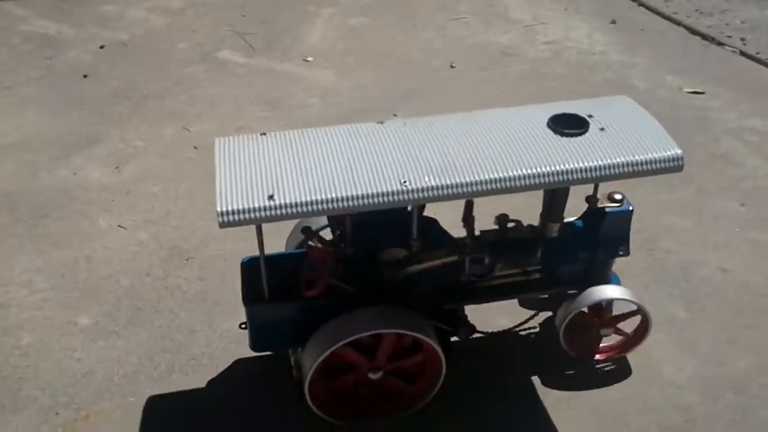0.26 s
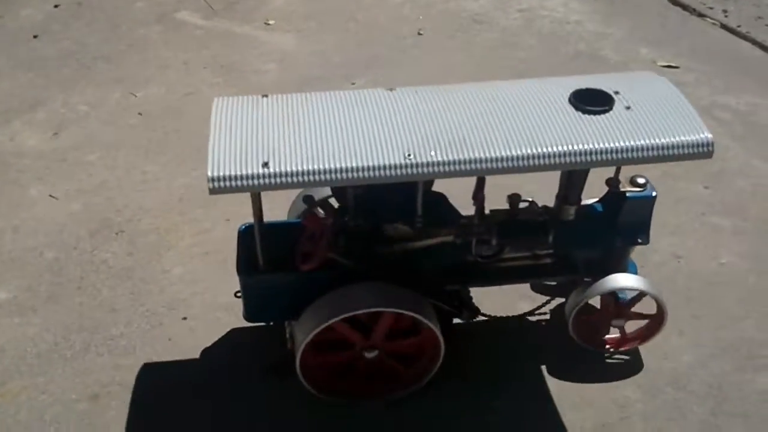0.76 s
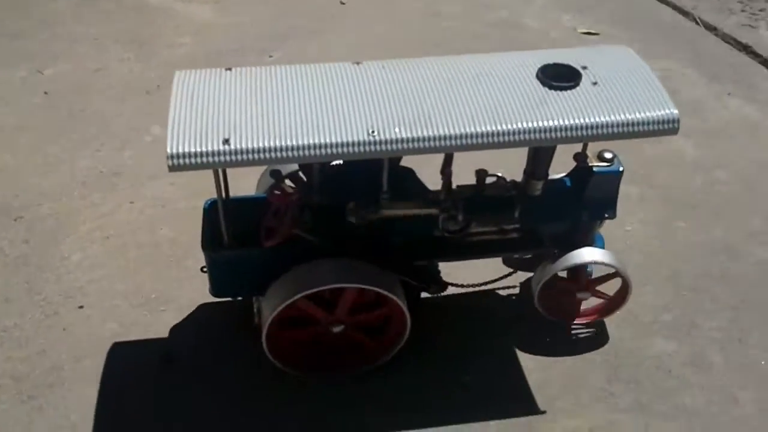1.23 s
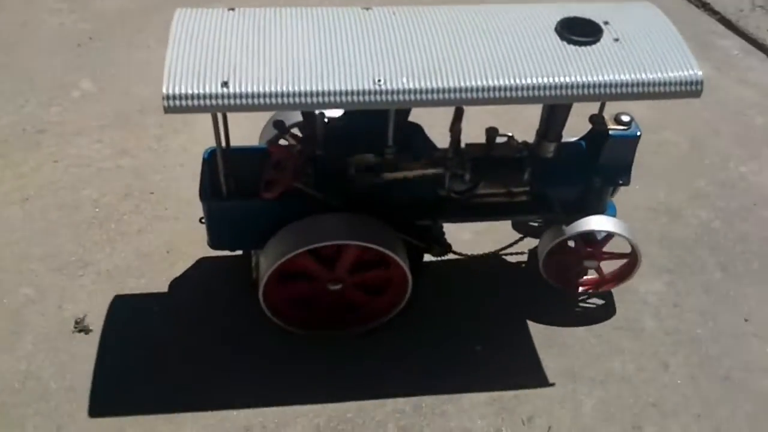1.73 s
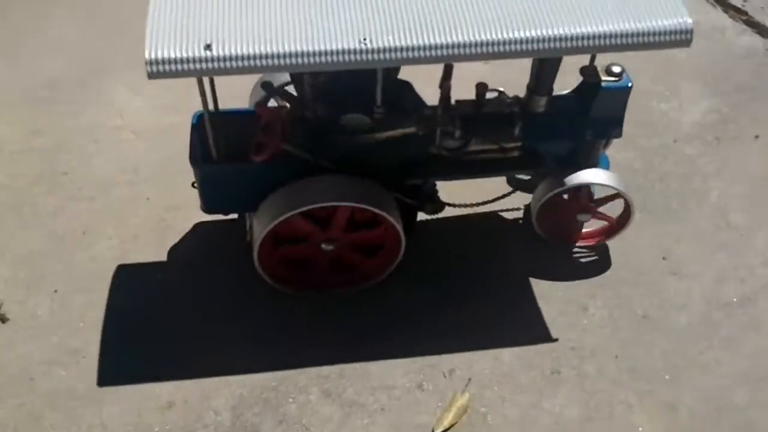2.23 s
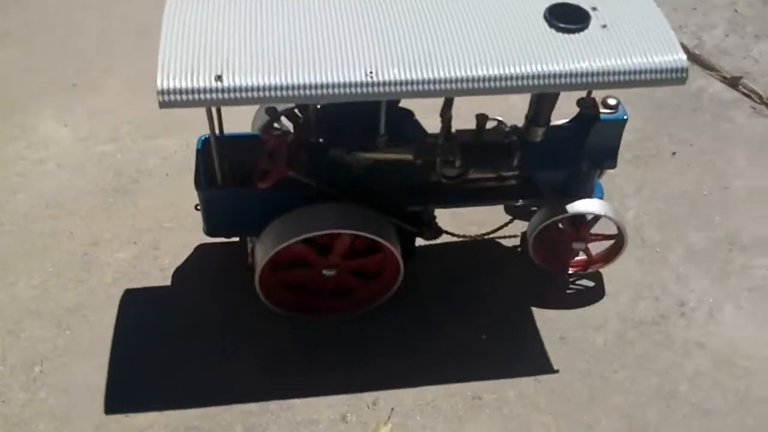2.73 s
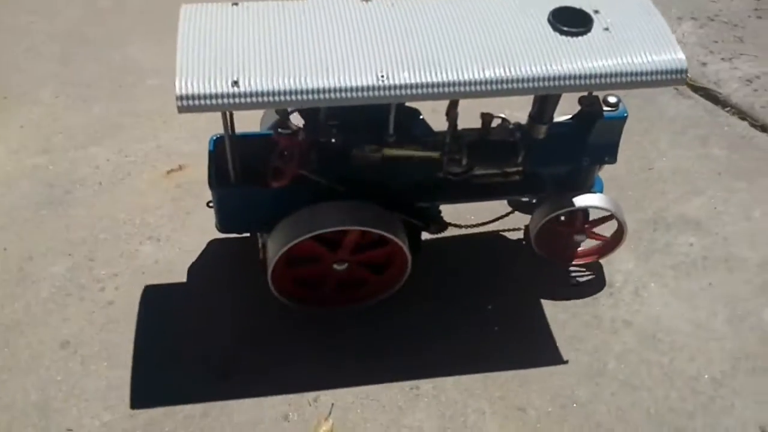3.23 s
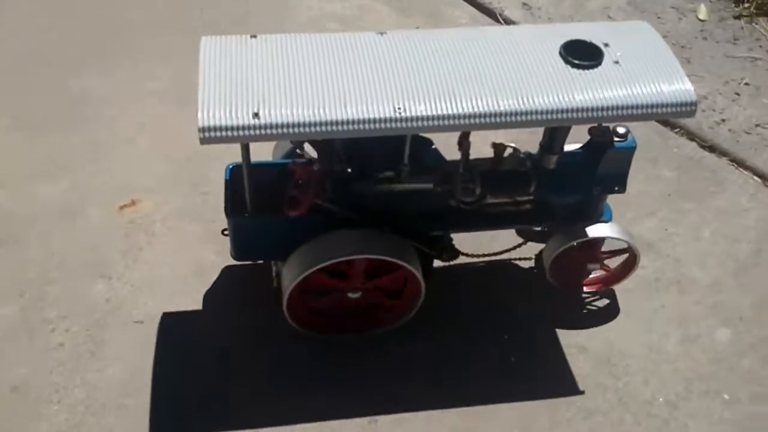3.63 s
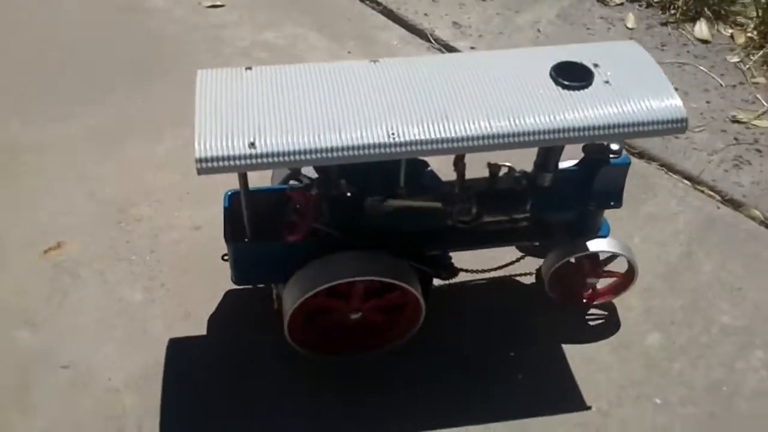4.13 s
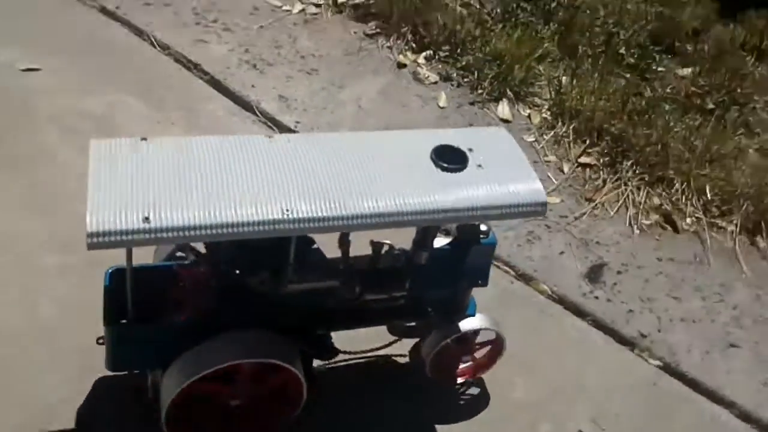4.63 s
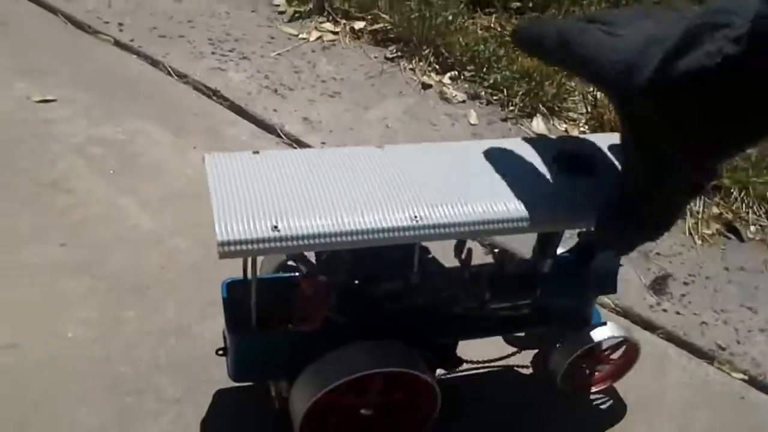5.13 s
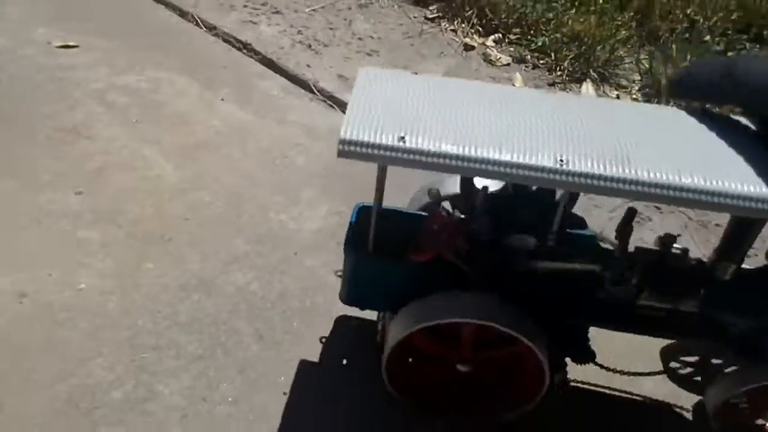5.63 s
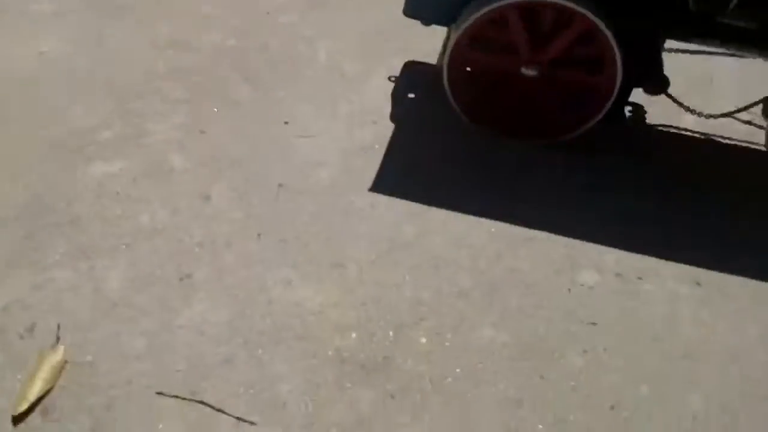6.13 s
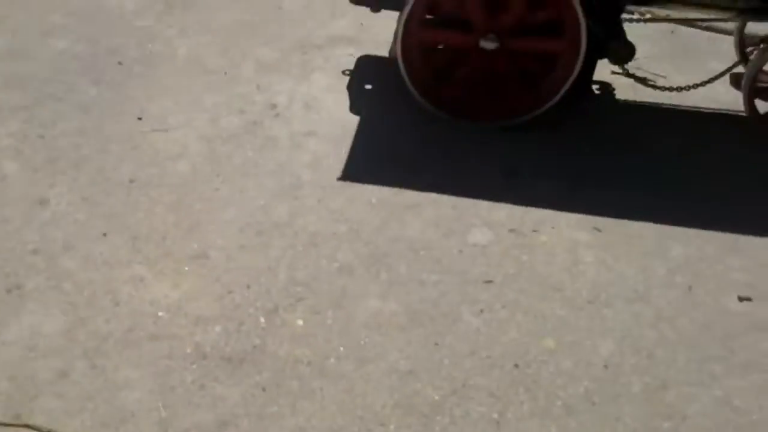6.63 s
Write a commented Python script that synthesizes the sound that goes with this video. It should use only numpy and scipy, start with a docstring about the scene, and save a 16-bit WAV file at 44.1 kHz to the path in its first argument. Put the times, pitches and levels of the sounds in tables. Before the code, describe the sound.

From 0 seconds a small metal engine is already running close by on outdoor concrete. Around sixteen or seventeen quick strokes a second load a tin gear train, giving a fast, slightly irregular brrr of bright chatter, ringing mostly around 4 kHz, with hollow roof and boiler rattle below and fine, hissy steel fizz above. Hard dry ticks and knocks stand out, stronger from about 1.7 seconds, with especially sharp ones near 4.2 and 4.7. Loose links tink briefly throughout. Between 5 and 5.8 seconds knocks crowd together. At about 5.85 the wheels scrape harshly, ease briefly around 6.0 as a bright clink sounds, then drag in gritty bursts, strongest near 6.35, with looser, uneven strokes and more clinks to the cut at about 6.9. Faint steady traffic rumbles far underneath. The sound is dry, centred and identical in both channels.

```python
"""Fast tinny chatter with bright knocks: a toy steam tractor rolls over concrete close by.
Piston strokes load a tin gear train, whose teeth ring the body by touches and short tone bursts.
Loose steel links tink as decaying sines; wheels grind on grit as noise touches; far traffic rumbles.
Wheel scrape runs throughout and peaks near the end, as a hand grips the roof and drags the wheels round.
One microphone feeds both channels."""
import sys
import numpy as np
from scipy import signal
from scipy.fft import rfft, irfft, next_fast_len
from scipy.io import wavfile
from scipy.ndimage import uniform_filter1d, map_coordinates

SR = 44100
rng = np.random.default_rng(int(sys.argv[2]) if len(sys.argv) > 2 else 0)


def transcribe(signal):
    """Save signal, clipped to [-1, 1], as a 16-bit WAV file at the path in sys.argv[1]."""
    frames = np.atleast_2d(signal).T
    limited = np.clip(frames, -1, 1)
    pcm = np.round(limited * 32767).astype(np.int16)
    wavfile.write(sys.argv[1], SR, pcm)


N = 302526

# Engine drive, interpolated: time_s, grind_db, boiler_db, roof_db, small_parts_db
RUNNING_LEVELS = [(0, -34, -16.5, -13, -17), (1.2, -33, -17, -10.5, -23.5), (2, -35, -13.5, -13, -19.5),
                  (2.7, -33.5, -17, -12.5, -23), (3.2, -35, -15.5, -12, -19.5),
                  (3.8, -33.5, -16.5, -11, -24), (4.7, -34.5, -15, -12.5, -18),
                  (5.4, -35, -13.5, -11.5, -24), (5.75, -38.5, -10.5, -9.5, -17.5),
                  (6.051, -40, -16, -15, -21.5), (6.5, -37, -16, -12, -18.5),
                  (6.86, -33.5, -18.5, -10.5, -16.5)]
# Piston strokes and drags: start_s, load_db, hold_s
PISTON_STROKES = [(0.0, -22.5, 0.011), (0.061, -25.0, 0.018), (0.134, -26.5, 0.048), (0.188, -23, 0.019),
                  (0.244, -24.5, 0.022), (0.319, -24, 0.029), (0.368, -23, 0.021), (0.418, -41, 0.033),
                  (0.507, -23.5, 0.056), (0.573, -20.0, 0.019), (0.612, -32.5, 0.043), (0.682, -31, 0.038),
                  (0.741, -23, 0.044), (0.832, -35, 0.0), (0.87, -37, 0.068), (0.948, -22.5, 0.0094),
                  (0.979, -21.5, 0.03), (1.046, -33, 0.06), (1.126, -21.5, 0.057), (1.237, -20, 0.00079),
                  (1.291, -22, 0.021), (1.352, -21.5, 0.025), (1.414, -20.5, 0.015), (1.479, -21, 0.013),
                  (1.54, -20, 0.01), (1.6, -23.0, 0.012), (1.662, -24.5, 0.056), (1.735, -24.5, 0.0),
                  (1.786, -20.5, 0.014), (1.847, -26, 0.033), (1.897, -22, 0.019), (1.969, -24, 0.0052),
                  (2.023, -23.0, 0.018), (2.085, -24.0, 0.017), (2.145, -22.5, 0.044), (2.211, -21, 0.0098),
                  (2.266, -22.5, 0.019), (2.325, -21, 0.017), (2.387, -21, 0.018), (2.439, -26.5, 0.014),
                  (2.481, -38, 0.0), (2.499, -19.5, 0.023), (2.567, -28, 0.025), (2.62, -19.5, 0.024),
                  (2.689, -18, 0.019), (2.749, -31, 0), (2.809, -39, 0.0074), (2.866, -20.0, 0.027),
                  (2.927, -21.5, 0.017), (2.981, -22.5, 0.016), (3.019, -21.5, 0.042),
                  (3.104, -30.0, 0.057), (3.179, -22, 0.014), (3.225, -20, 0.015), (3.297, -28, 0.0),
                  (3.358, -17.5, 0.015), (3.41, -25.5, 0.014), (3.466, -27, 0.047), (3.535, -27.5, 0.026),
                  (3.593, -24, 0.025), (3.659, -27.5, 0.017), (3.714, -20, 0.016), (3.772, -22.0, 0.028),
                  (3.833, -23.0, 0.034), (3.891, -28.5, 0.055), (3.963, -20.5, 0.017), (4.021, -22, 0.017),
                  (4.08, -24, 0.032), (4.146, -21, 0.02), (4.206, -27, 0.0056), (4.262, -21.5, 0.022),
                  (4.324, -24, 0.039), (4.392, -22.5, 0.014), (4.436, -36, 0.024), (4.508, -21, 0.026),
                  (4.57, -18.5, 0.018), (4.633, -30.5, 0.0073), (4.658, -34, 0.0), (4.693, -24.5, 0.044),
                  (4.753, -23.5, 0.0035), (4.819, -25.5, 0.0091), (4.864, -31.5, 0.0), (4.881, -23, 0.02),
                  (4.939, -24, 0.024), (4.995, -19.5, 0.016), (5.064, -22.5, 0.01), (5.128, -17.5, 0.0059),
                  (5.175, -22.5, 0.034), (5.243, -25, 0.059), (5.307, -24, 0.045), (5.378, -20, 0.012),
                  (5.43, -27, 0.05), (5.487, -25, 0.022), (5.572, -22.0, 0.024), (5.626, -22.5, 0.016),
                  (5.663, -23.5, 0.0072), (5.689, -23.5, 0.02), (5.738, -19, 0.02), (5.785, -22, 0),
                  (5.818, -25.0, 0.0075), (5.845, -31.5, 0.0082), (5.875, -19.5, 0), (5.913, -21.5, 0.016),
                  (5.952, -26, 0.04), (6.04, -19.0, 0.0), (6.097, -25, 0.0), (6.131, -20, 0.087),
                  (6.276, -34.5, 0.0099), (6.295, -37.5, 0.024), (6.337, -19.5, 0.0049),
                  (6.395, -29.5, 0.07), (6.474, -25.5, 0.055), (6.561, -25.0, 0.019), (6.678, -28, 0.04),
                  (6.735, -21.5, 0.037), (6.808, -32.5, 0.02)]
# Hardest tooth knocks: centre_s, level_db, length_ms
TOOTH_KNOCKS = [(0.1458, -12.5, 2.2), (0.1759, -16, 1.3), (0.248, -14, 1.4), (0.2641, -13, 1.5),
                (0.3312, -13.5, 1.6), (0.3948, -12, 1.5), (0.484, -15, 0.6), (0.654, -17, 1.8),
                (0.8953, -9.5, 0.55), (0.9544, -12, 1.6), (1.057, -13.5, 3), (1.204, -15, 0.6),
                (1.2408, -12.5, 0.6), (1.396, -13, 0.6), (1.4479, -17, 0.54), (1.68, -9.5, 1.8),
                (1.7381, -10, 1.65), (1.7473, -6, 1), (1.7987, -7, 2), (2.153, -7.5, 0.7), (2.167, -5, 1.1),
                (2.2278, -6, 2), (2.288, -12.5, 1.5), (2.34, -17, 1), (2.445, -13.5, 1.6),
                (2.4845, -12, 1.14), (2.5656, -9, 1.4), (2.587, -9, 0.84), (2.6462, -8, 2.2),
                (2.703, -9, 1.03), (2.707, -8, 0.7), (2.82, -14, 1.2), (2.868, -10, 0.79), (2.894, -7, 1.6),
                (2.9336, -8, 0.55), (2.9495, -20, 1.36), (2.964, -12, 0.47), (3.127, -9, 1.0),
                (3.2015, -11.5, 1.5), (3.252, -9, 1.7), (3.3038, -16, 1.6), (3.3314, -18, 0.4),
                (3.3596, -13, 1.1), (3.3771, -5, 1.2), (3.3825, -12, 0.54), (3.4428, -8.5, 0.9),
                (3.4842, -11, 1.0), (3.6388, -15, 0.9), (3.739, -8.5, 1.3), (3.7897, -8, 0.94),
                (3.8604, -11, 1.5), (3.972, -10, 0.54), (4.0627, -18, 1.1), (4.1584, -13, 1.3),
                (4.1783, -2, 0.43), (4.23, -11, 0.87), (4.2821, -11, 0.9), (4.2918, -11, 0.71),
                (4.3024, -16, 1.0), (4.333, -13, 0.66), (4.395, -4.5, 0.29), (4.5099, -20, 1.1),
                (4.5297, -8, 1.5), (4.6646, -12, 0.46), (4.7005, 0, 0.35), (4.7084, -11, 1.0),
                (4.7305, -12, 0.57), (4.823, -13.5, 1.8), (4.964, -11, 1.3), (5.0106, -11, 1.8),
                (5.0153, -5, 1.24), (5.0688, -19, 1.0), (5.1297, -9, 1.4), (5.1395, -13, 1.1),
                (5.2015, -12.5, 1.64), (5.2074, -10, 1.13), (5.2467, -11.5, 1.0), (5.325, -9, 1.44),
                (5.3768, -8, 0.97), (5.3815, -9, 1.3), (5.3871, -8, 1.5), (5.393, -9, 1.3),
                (5.4548, -6.5, 1.6), (5.496, -8, 1.1), (5.508, -6, 1.5), (5.5135, -10, 1.7),
                (5.5778, -12, 1.1), (5.5855, -10, 1.6), (5.6078, -7.5, 1.1), (5.64, -9, 1.1),
                (5.6443, -7, 0.95), (5.6495, -5, 0.7), (5.6693, -9, 1.5), (5.6742, -5, 1.1), (5.7, -4, 0.8),
                (5.7205, -8, 0.62), (5.751, -8, 0.6), (5.8552, -14, 0.75), (5.8926, -13, 0.91),
                (5.9151, -14, 0.53), (5.9264, -5, 0.76), (5.9651, -12, 0.66), (5.9807, -8, 0.42),
                (6.0471, -5, 1.3), (6.0536, -16, 0.93), (6.0712, -15, 0.6), (6.137, -15, 0.71),
                (6.2985, -14, 0.64), (6.3432, -12, 0.9), (6.6103, -16, 0.9)]
# Main shell note as it turns past the microphone: time_s, pitch_hz
SHELL_PITCH = [(0, 4080), (1.2, 4180), (2.3, 4200), (3.3, 4160), (4.2, 4080), (5.3, 4060), (5.9, 4104),
               (6.86, 4320)]
# Hand damps the tin, wheels scrape: time_s, scrape_share (0-1)
HAND_GRIP = [(0, 0.18), (5.4, 0.13), (5.56, 0.45), (5.72, 0.24), (5.849, 1), (6, 0.05), (6.13, 0.64),
             (6.25, 0.3), (6.35, 1), (6.451, 0.42), (6.6, 0.47), (6.72, 0.5), (6.86, .7)]
# Bright tin modes: centre_hz, width_hz, relative_level_db
SHELL_MODES = [(2150, 120, -38), (2630, 140, -15), (2930, 260, -10.5), (3370, 120, -2.5), (3722, 118, 2.5),
               (3903, 233, 3.5), (4143, 164, 4.5), (4980, 69, -17), (4700, 380, -28), (5280, 290, -11.5),
               (5850, 50, -14), (6190, 270, -28.5)]
# Roof modes: centre_hz, width_hz, relative_level_db
ROOF_MODES = [(961, 35, -3.5), (1224, 210, -5), (1453, 370, -7.5), (1740, 147, 1)]
# Boiler modes: centre_hz, width_hz, relative_level_db
BOILER_MODES = [(514, 84, -2), (658, 91, 0)]
# Frame modes: centre_hz, width_hz, relative_level_db
FRAME_MODES = [(366, 31, -2), (455, 75, -1.5)]
# Small steel parts: centre_hz, width_hz, relative_level_db
SMALL_PART_MODES = [(7090, 84, 6), (7360, 310, -0.5), (8455, 230, 7), (9200, 330, 2), (9700, 410, -3.5),
                    (11100, 140, -4.5), (11770, 160, -4), (12620, 68, 9), (13000, 210, -21),
                    (13900, 690, -10.5)]
# Wheels on concrete, spectrum: frequency_hz, relative_density_db
SCRAPE_SPECTRUM = [(700, -29.5), (950, -9), (1150, 0), (1400, -14.5), (1580, -1.5), (1900, -9),
                   (2200, -7.5), (2450, -1.5), (2900, -3.5), (3900, 1), (4800, -1), (6000, -9), (8000, -29),
                   (12000, -34.5)]
# Loose link tinks: start_s, relative_level_db, strongest_pitch_hz
LINK_TINKS = [(0.189, -22.5, 8500), (0.3264, -22, 5760), (0.667, -19, 5930), (0.71, -18.5, 7240),
              (.7427, -27, 6000), (.9537, -23.5, 5790), (1.046, -20, 5760), (1.0735, -17.5, 5720),
              (1.1149, -27, 5910), (1.2212, -24, 5950), (1.478, -22, 5730), (1.6945, -26, 6000),
              (2.0213, -30, 8640), (2.0338, -22, 5770), (2.1014, -22, 5700), (2.3365, -21.5, 5860),
              (2.6843, -20.5, 5950), (2.8673, -37, 5640), (3.2029, -17, 6060), (3.2954, -26.5, 9240),
              (3.309, -20, 13360), (3.3647, -33, 5900), (3.6636, -28, 5950), (3.7763, -29, 6190),
              (3.808, -16.5, 5620), (3.9439, -20.5, 5930), (4.0073, -24, 5730), (4.137, -25, 8150),
              (4.416, -24, 12500), (4.593, -23, 12500), (4.6524, -21.5, 6040), (4.6999, -21, 5700),
              (4.817, -25.5, 8420), (4.996, -19.5, 5860), (5.1337, -34, 5840), (5.4335, -25, 5840),
              (5.5797, -18.5, 6200), (5.7004, -24, 5850), (5.8378, -34, 5820), (6.0428, -11, 6620),
              (6.254, -17, 6000), (6.509, -14, 7180), (6.6813, -26, 5910), (6.7863, -14.5, 5980),
              (6.817, -21, 12500)]
# Steel link ringing: pitch_hz, relative_level_db, t60_s
LINK_RINGS = [(5950, 0, 0.12), (6800, -8, 0.04), (7100, -9.5, 0.19), (7830, 1, 0.028), (8450, -2.5, 0.07),
              (9260, -1, 0.06), (11150, -7, 0.091), (12500, -5, 0.052), (14200, -3, 0.022)]
# Far traffic spectrum: frequency_hz, relative_density_db
TRAFFIC_SPECTRUM = [(15, -45), (25, -10), (38, -20.5), (75, -0.5), (102, 1), (260, -5), (290, -8),
                    (330, -11.5), (430, -46), (730, -120)]

TEETH_PER_S = 197
BITE_S, BITE_SHARE, RISE_S, FALL_T60_S = 0.0033, 0.89, 0.012, 0.088  # stroke envelope
SLACK_S, FIRM_GAP_S = 0.003, 0.0102  # slack before the first firm tooth; gap between firm teeth
KNOCK_SPREAD = 0.037  # log-pitch scatter
OTHER_NOTES_DB = -7.5  # other link notes and crack, before their own gains
TRAFFIC_DB = -48.5
ROLL_HZ, TOP_HZ = 14100, 15100


def engine():
    """Tooth chatter, wheel grind and knocks excite the resonances of one tin body."""
    time_s = np.arange(N) / SR
    running_s, *columns = np.transpose(RUNNING_LEVELS)
    grind_db, boiler_db, roof_db, small_parts_db = [np.interp(time_s, running_s, c) for c in columns]
    grip = np.clip(np.interp(time_s, *np.transpose(HAND_GRIP)), 0, 1)
    free, dragged = np.sqrt(1 - grip), np.sqrt(grip)
    force = stroke_load()
    chatter = gear_chatter(force)
    grind = wheel_grind(grind_db)
    heave = uniform_filter1d(force, SR // 70) * rng.standard_normal(N)  # heavy boiler follows load slowly
    simmer = amp(-34) * rng.standard_normal(N)  # boiler hums on between strokes
    hiss = amp(-29.5 + 4.9 * wobble(25)) * rng.standard_normal(N)

    light_teeth = 0.34 * force * teeth(TEETH_PER_S, spread=0.1, scatter_db=2, ms=1.14)
    rings = free * (light_teeth + firm_teeth(force)) + knocks()
    shell = 0.82 * shifting(SHELL_MODES, free * (chatter + grind), vary_db=2.5)
    scrape = wheel_scrape(force, chatter, grind, dragged)
    boiler_force = amp(boiler_db) * (0.24 * chatter + 0.75 * heave + 2 * grind + simmer)
    boiler = through(modes(BOILER_MODES), boiler_force)
    frame_force = amp(-21.5) * (0.5 * chatter + 0.62 * heave + 2.4 * grind)
    frame = through(modes(FRAME_MODES), frame_force)
    roof = shifting(ROOF_MODES, amp(roof_db) * (1.26 * chatter + 1.8 * grind), vary_db=0.95)
    small_parts = through(small_part_response, amp(small_parts_db) * (0.83 * chatter + hiss))
    return rings + shell + scrape + boiler + frame + roof + small_parts


def stroke_load():
    """Gear force: bites at each stroke, swells, holds and dies away."""
    force, t = np.zeros(N + SR), np.arange(SR // 3) / SR
    bite = np.minimum(t / BITE_S, 1)
    swell = BITE_SHARE + (1 - BITE_SHARE) * np.minimum(t / RISE_S, 1)
    for start_s, load_db, hold_s in PISTON_STROKES:
        fall_db = -60 * np.maximum(t - RISE_S - hold_s, 0) / FALL_T60_S
        force[round(start_s * SR):][:len(t)] += bite * swell * amp(load_db + fall_db)
    return force[:N]


def gear_chatter(force):
    """Loaded teeth rattle as they land amid gritty touches; hard knocks add jolts."""
    rebounds = contacts(TEETH_PER_S, jitter=0.24, scatter_db=3.5, touch_s=0.00074)
    grit = contacts(600, jitter=0.924, scatter_db=0.5, touch_s=0.00029)
    return force * (0.45 * rebounds + 0.5 * grit) + jolts()


def jolts():
    """Hard knocks jolt the whole body with short noise bursts."""
    centre_s, level_db = np.transpose(TOOTH_KNOCKS)[:2]
    at = np.round((centre_s - 0.001) * SR).astype(int)
    gate = signal.fftconvolve(np.bincount(at, amp(level_db - 18), N), bump(0.0006))[:N]
    return gate * rng.standard_normal(N)


def knocks():
    """The hardest teeth ring the shell near its main note."""
    centre_s, level_db, length_ms = np.transpose(TOOTH_KNOCKS)
    pitch_hz = shell_note(centre_s, KNOCK_SPREAD, rng.standard_normal(len(centre_s)))
    return blips(centre_s, level_db, pitch_hz, length_ms)


def firm_teeth(force):
    """From each stroke's start about every second tooth lands harder, its level following the load."""
    start_s = np.transpose(PISTON_STROKES)[0]
    step = np.arange(12)
    s = start_s[:, None] + SLACK_S + step * FIRM_GAP_S
    late, size, pitch, length = rng.standard_normal((len(start_s), len(step), 4)).transpose(2, 0, 1)
    on = s < np.append(start_s[1:], N / SR)[:, None]  # stop at the next stroke
    s = s + 0.0012 * late
    load_db = 20 * np.log10(force[np.clip((s * SR).astype(int), 0, N - 1)] + 1e-6)
    level_db = load_db + 3 + 3 * size + 3 * (step == 0)
    pitch_hz = shell_note(s, KNOCK_SPREAD, pitch)
    length_ms = 0.98 * np.exp(0.44 * length)
    return blips(s[on], level_db[on], pitch_hz[on], length_ms[on])


def teeth(rate_hz, spread, scatter_db, ms):
    """Every tooth rings another part of the shell; rms 1."""
    count = int(rate_hz * N / SR)
    late, size, pitch, length = rng.standard_normal((count, 4)).T
    s = (np.arange(count) + 0.22 * late) / rate_hz
    return unit(blips(s, scatter_db * size, shell_note(s, spread, pitch), ms * np.exp(0.64 * length)))


def shell_note(s, spread, draw):
    """Note of a tooth landing at s, scattered about the shell's main note."""
    return np.interp(s, *np.transpose(SHELL_PITCH)) * np.exp(spread * draw)


def blips(s, level_db, pitch_hz, length_ms):
    """Short swelling and fading shell rings, one per contact."""
    t = np.arange(-150, 150) / SR
    shape = np.exp(-4 * np.log(2) * (1000 * t / length_ms[:, None]) ** 2)  # length = width at half height
    cycles = pitch_hz[:, None] * t + rng.random((len(s), 1))
    ring = amp(level_db)[:, None] * shape * np.sin(2 * np.pi * cycles)
    at = np.clip(np.round((s[:, None] + t) * SR), 0, N - 1).astype(int)
    return np.bincount(at.ravel(), ring.ravel(), N)


def small_part_response(hz):
    """Small steel parts resonate high and radiate low tones weakly."""
    high_pass = hz ** 2 / (hz ** 2 - 6000 ** 2 - 1j * hz * 6000)
    return modes(SMALL_PART_MODES)(hz) * high_pass


def wheel_grind(grind_db):
    """Wheels crush grit: irregular touches at a fluctuating level."""
    touches = contacts(500, jitter=1.0, scatter_db=7.5, touch_s=0.00079)
    return amp(grind_db + 3.15 * np.tanh(wobble(40))) * touches


def wheel_scrape(force, chatter, grind, dragged):
    """Skidding rims meet dense grit, coloured by wheels on concrete."""
    rub = force * contacts(2500, jitter=1, scatter_db=4.0, touch_s=0.00025)
    colour = rfft(causal(SCRAPE_SPECTRUM))
    response = lambda hz: np.interp(hz, np.linspace(0, SR / 2, len(colour)), colour)
    return through(response, dragged * (0.95 * chatter + 0.86 * rub + 1.66 * grind))


def links():
    """Each tink rings loose steel, strongest near its own note, with crack and rattle."""
    out, t = np.zeros(N + SR), np.arange(SR // 8) / SR
    for start_s, level_db, pitch_hz in LINK_TINKS:
        ring = np.zeros(len(t))
        for (ring_hz, ring_db, t60_s), more_db in zip(LINK_RINGS, rng.normal(0, 3, len(LINK_RINGS))):
            ring += amp(ring_db + more_db - 60 * t / t60_s) * np.sin(2 * np.pi * ring_hz * t)
        note = 0.9 * amp(-60 * t / 0.04) * np.sin(2 * np.pi * pitch_hz * t)
        crack = 1.94 * amp(-60 * t / 0.016) * np.diff(rng.standard_normal(len(t) + 1))
        rattle = 1 + 0.6 * unit(uniform_filter1d(rng.standard_normal(len(t)), size=60))
        tink = rattle * (amp(OTHER_NOTES_DB) * (0.81 * ring + crack) + note)
        onset = 1 - np.exp(-t / 0.00079)
        out[round(start_s * SR):][:len(t)] += amp(level_db - 6.5) * tink * onset
    return out[:N]


def traffic():
    """Far, nearly steady rumble: noise shaped by a fixed spectrum."""
    rumble = filtered(rng.standard_normal(N), lambda hz: amp(along(TRAFFIC_SPECTRUM, hz)))
    return amp(TRAFFIC_DB + 0.14 * wobble(2.34)) * unit(rumble)


def contacts(rate_hz, jitter, scatter_db, touch_s):
    """Brief metal touches, unevenly timed and sized, gate noise; rms 1."""
    count = int(rate_hz * N / SR)
    late, size = rng.standard_normal((count, 2)).T
    at = np.clip((np.arange(count) + jitter * late) * SR / rate_hz, 0, N - 1).astype(int)
    strength = amp(scatter_db * np.tanh(size / 2) * 2)
    gate = signal.fftconvolve(np.bincount(at, strength, N), bump(touch_s))[:N]
    return unit(gate * rng.standard_normal(N))


def bump(touch_s):
    """Contact force: swells for touch_s, then fades."""
    u = np.arange(SR // 50) / SR / touch_s
    return u * np.exp(1 - u)


def shifting(table, force, vary_db):
    """Blows land on other spots, so each mode is driven at its own changing strength."""
    hz = np.linspace(0, SR / 2, 2 ** 12)
    total = np.zeros(N)
    for k, mode in enumerate(table):
        drive = amp(vary_db * wobble(18)) * force
        total += (-1) ** k * filtered(drive, modes([mode]))
    return total / np.sqrt(np.mean(np.abs(modes(table)(hz)) ** 2))


def through(response, force):
    """Force heard through a body that passes white noise at unit gain."""
    hz = np.linspace(0, SR / 2, 2 ** 12)
    return filtered(force, response) / np.sqrt(np.mean(np.abs(response(hz)) ** 2))


def modes(table):
    """Response of summed causal resonances with alternating sign."""
    def response(hz):
        return sum((-1) ** k * amp(db) * 1j * hz * width / (centre ** 2 - hz ** 2 + 1j * hz * width)
                   for k, (centre, width, db) in enumerate(table))
    return response


def causal(spectrum):
    """Minimum-phase impulse response of a spectrum, by folding its cepstrum."""
    size = 2 ** 11
    level = amp(along(spectrum, np.fft.rfftfreq(size, 1 / SR)))
    cepstrum = irfft(np.log(level + 1e-6), size)
    cepstrum[1:size // 2] *= 2
    cepstrum[size // 2 + 1:] = 0
    return irfft(np.exp(rfft(cepstrum)), size)


def filtered(x, response):
    """Apply a complex frequency response, zero-padded."""
    m = next_fast_len(N + SR // 2)
    return irfft(rfft(x, m) * response(np.fft.rfftfreq(m, 1 / SR)), m)[..., :N]


def along(points, hz):
    """Interpolate (frequency_hz, value) points on a log-frequency axis."""
    f, v = np.transpose(points)
    return np.interp(np.log(hz + 1), np.log(f + 1), v)


def wobble(rate_hz):
    """Smooth random curve, rate_hz knots a second."""
    knots = rng.standard_normal(int(N * rate_hz / SR) + 4)
    return map_coordinates(knots, [np.arange(N) * rate_hz / SR])


def amp(db):
    """Decibels to amplitude."""
    return 10 ** (np.asarray(db) / 20)


def unit(x):
    """Scale to rms 1."""
    return x / np.sqrt(np.mean(x ** 2) + 1e-20)


def scene():
    """Sum all sources; the same signal in both channels."""
    return np.tile(engine() + links() + traffic(), (2, 1))


def record(dry):
    """Round off the highest peaks, fade above ROLL_HZ and keep nothing from TOP_HZ up."""
    soft = dry / (1 + np.abs(dry / 0.93) ** 6) ** (1 / 6)
    return filtered(soft, lambda hz: amp(-0.02 * np.maximum(hz - ROLL_HZ, 0)) * (hz < TOP_HZ))


dry = scene()
out = record(dry)
transcribe(out)
```